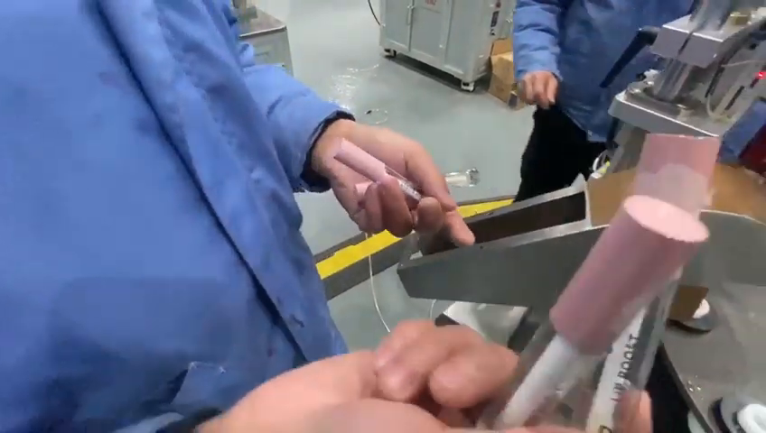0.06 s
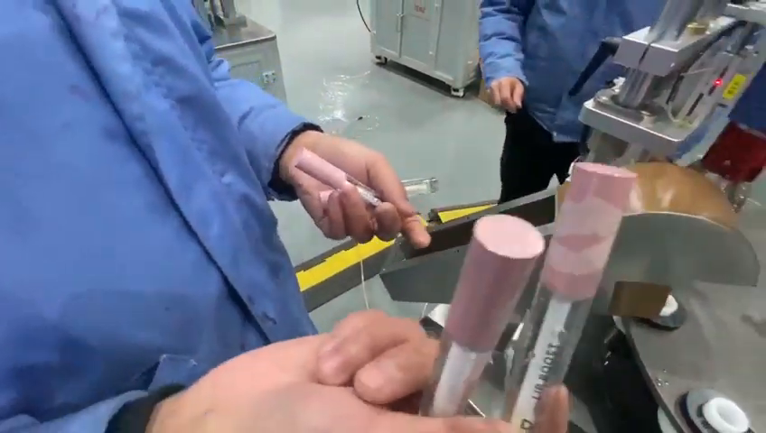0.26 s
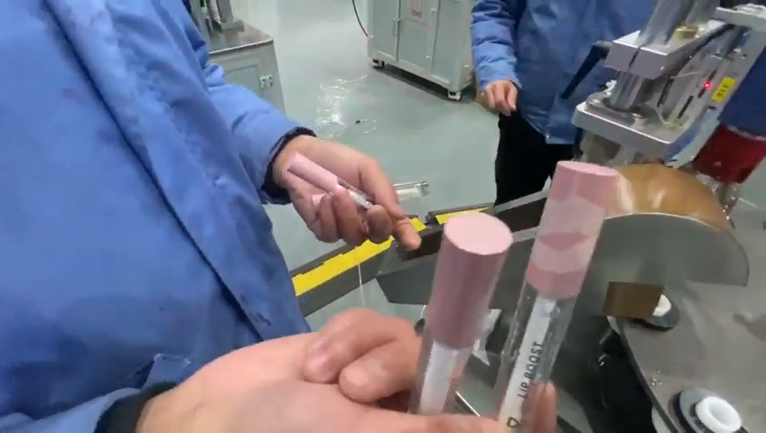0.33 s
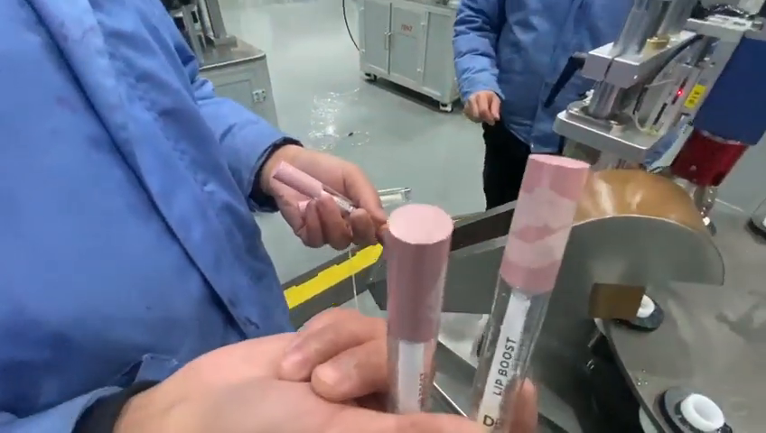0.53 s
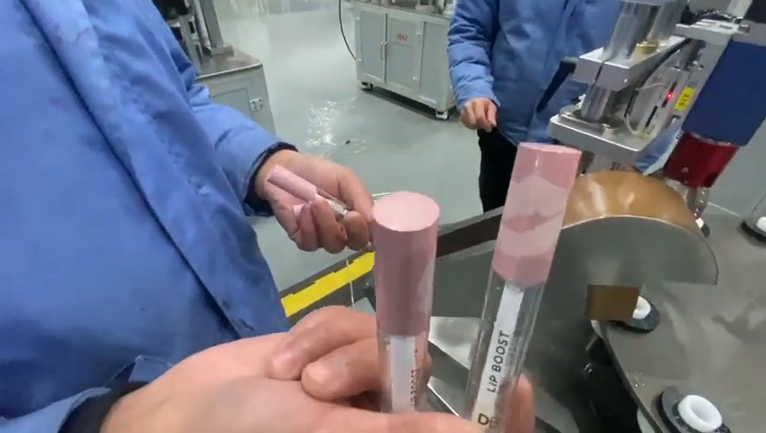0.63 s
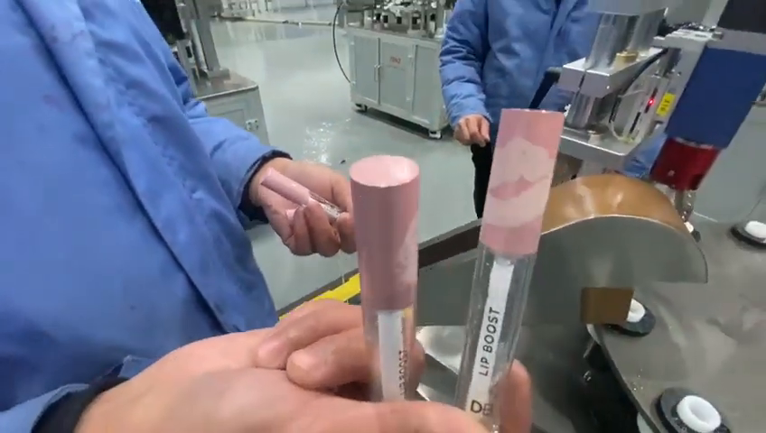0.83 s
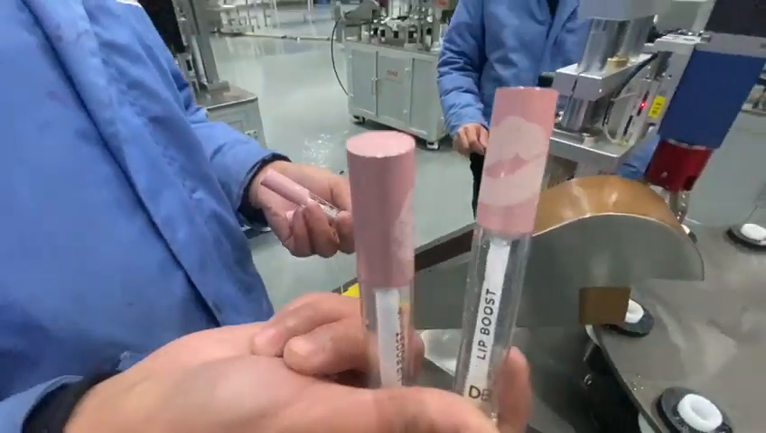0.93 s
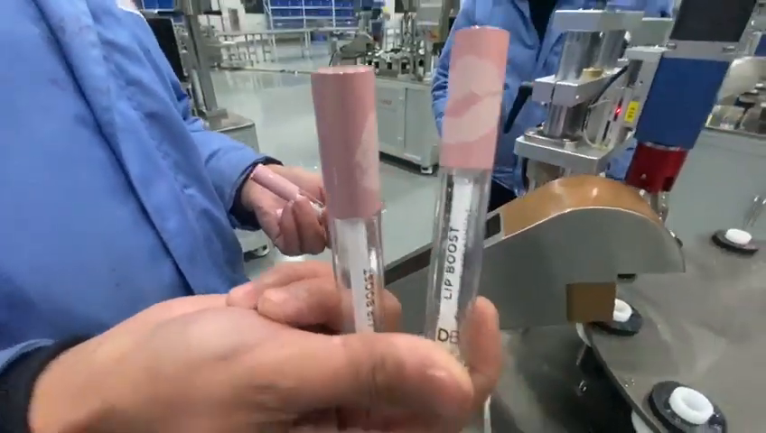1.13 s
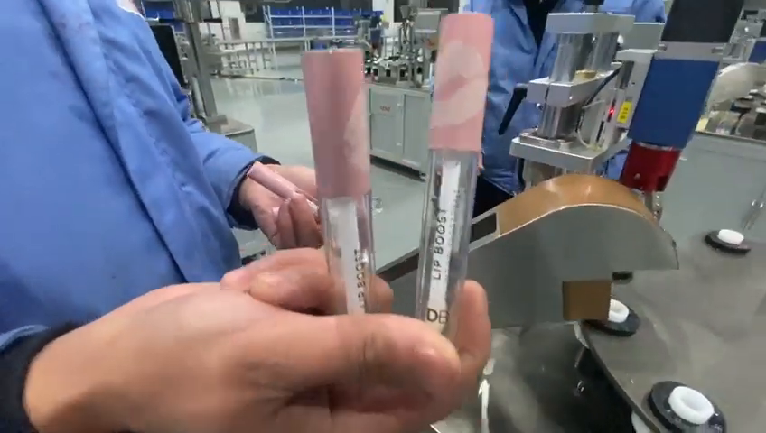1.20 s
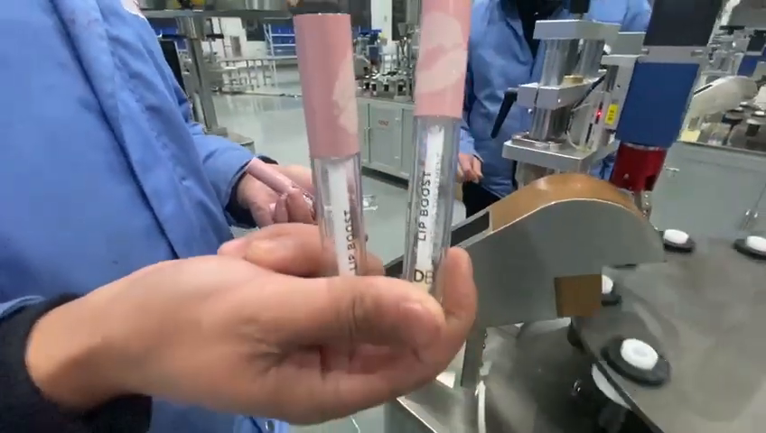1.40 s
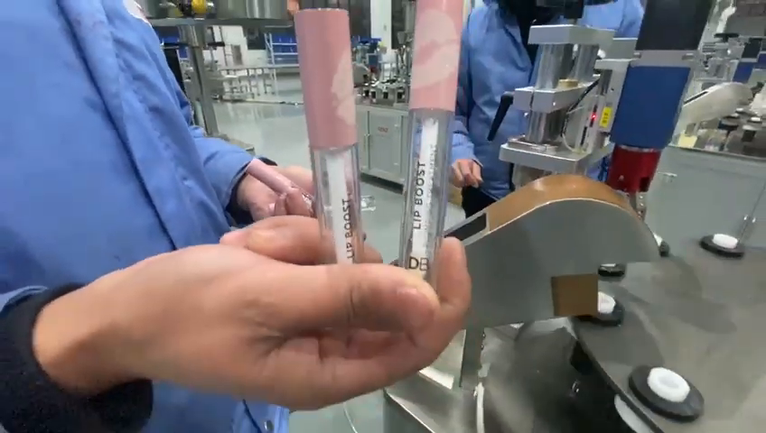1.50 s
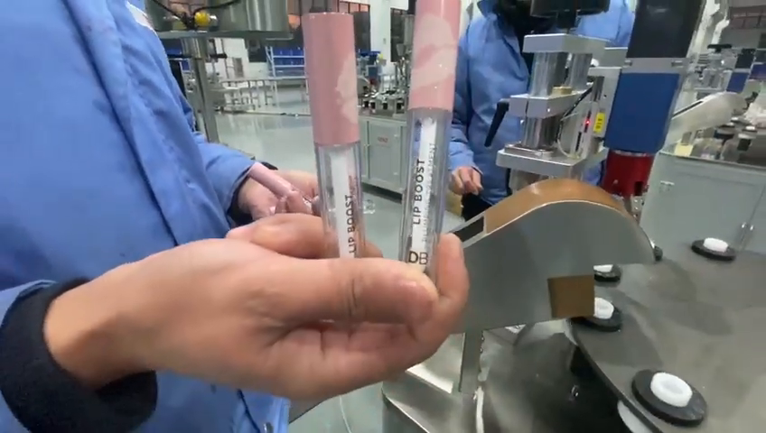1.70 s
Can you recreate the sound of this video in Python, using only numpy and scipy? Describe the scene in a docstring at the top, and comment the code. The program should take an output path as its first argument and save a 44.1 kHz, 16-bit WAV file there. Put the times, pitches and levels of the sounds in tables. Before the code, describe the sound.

A single sharp metallic clack from a nearby machine hits at about 0.25 seconds, just after a brief hiss of air at 0.1, and rings away through a factory hall. A smaller knock follows at 0.45 seconds, then a duller, more distant double clack near 1.25, with a few faint taps around them. Ventilation hums throughout, and thin, high motor whines swell and fade softly.

```python
"""A factory workshop, close beside a tube-filling machine, on a hand-held stereo microphone.
Air hisses briefly, then a part snaps home with one sharp metallic clack that rings in the frame and
dies away in the hall. Small knocks follow, one duller double clack further off. Ventilation hums
throughout and motor drives whine, swelling and fading as the microphone moves."""
import sys
import numpy as np
from scipy.fft import rfft, irfft, next_fast_len
from scipy.io import wavfile
from scipy.ndimage import map_coordinates

SR = 44100
rng = np.random.default_rng(int(sys.argv[2]) if len(sys.argv) > 2 else 0)


def generate_wav(sig):
    """Save sig (samples, or channels by samples) to the path in sys.argv[1] as 16-bit PCM at SR."""
    pcm = np.round(np.clip(np.atleast_2d(sig).T, -1, 1) * 32767).astype(np.int16)
    wavfile.write(sys.argv[1], SR, pcm)


N = 77175

CLACK_S, CLACK_DB, ATTACK_S = 0.2357, -7, 0.00048
FRAME_DB, RISE_CYCLES = -1, 0.91  # the modes take about a cycle to build up
HALL_DB, HALL_RISE_S, SCATTER_DB, SCATTER_T60_S = -30.5, 0.0034, -27, 0.17
KNOCK_RISE_S, KNOCK_PAN_DB, KNOCK_ROOM_DB, KNOCK_ROOM_T60_S = 0.0008, -5.5, -14.5, 0.29
AIR_S, AIR_DB, AIR_RELEASE_S, SPIT_DB, SPIT_T60_S = 0.1122, -46, 0.03, -43, 0.03
LOW_WHINE_HZ, HIGH_WHINE_HZ, WHINE_PAN_DB, WHINE_WAVER_DB = 2094.3, 3008, -13, 1.2
VENT_DB, TOP_HZ = -50, 15800

# Throughout, pan_db is left minus right and density_db is relative level per hertz.
# Colour of the clack's burst: freq_hz, density_db
BURST_SPECTRUM = [(120, -24), (450, -17.5), (600, -6), (830, 5.5), (1100, -6), (1500, -6), (2100, 0),
                  (2480, -13.5), (3000, 0), (4200, -10), (4750, -5.5), (5400, -15.5), (6300, -5.5),
                  (7200, -16.5), (8800, -2.5), (11500, -14), (15500, -27)]
# Decay of the burst: freq_hz, t60_s
BURST_DECAY = [(200, 0.062), (800, 0.05), (3000, 0.05), (5000, 0.043), (9000, 0.015), (15000, 0.021)]
# Direction of the burst: freq_hz, pan_db
BURST_BALANCE = [(200, 3), (700, -7), (1000, -3.5), (3000, 5.5), (6000, -10.5), (9000, -11.5),
                 (12000, -1.5)]
# Modes of the machine frame: pitch_hz, level_db (before FRAME_DB), t60_s, pan_db
FRAME_MODES = [(177, -37, 0.55, -11), (199, -24.5, 0.085, -14), (257, -30.5, 0.24, -27),
               (617, -27.5, 0.29, -13), (885, -32, 0.12, 11), (1065, -34.5, 0.19, 11),
               (1521, -27, 0.075, 2), (1925, -20, 0.064, -2), (2072, -26, 0.086, -6),
               (2246, -30.5, 0.16, 6), (2725, -16.5, 0.097, -8), (2820, -33.5, 0.41, 2),
               (3000, -48, 0.25, 0), (3150, -19, 0.046, 0), (3328, -22, 0.11, -3), (3760, -28, 0.12, -15),
               (4830, -18.5, 0.036, -6)]
# Colour of the hall's answer: freq_hz, density_db
HALL_SPECTRUM = [(100, -26), (250, -1.5), (450, -7.5), (650, -5), (920, 2.5), (1500, -3.5), (3100, 2.5),
                 (4300, -9.5), (6500, -12), (10000, -17.5), (15000, -39)]
# Decay of the hall: freq_hz, t60_s
HALL_DECAY = [(150, 0.25), (500, 0.91), (950, 1.78), (2000, 0.87), (3200, 0.78), (6000, 0.47),
              (12000, 0.37)]
# Direction of the hall's answer and of the air jet: freq_hz, pan_db
HALL_BALANCE = [(200, -14), (1000, -3.5), (3000, -5.5), (9000, -5.0)]
AIR_BALANCE = [(2000, -3.5), (9000, -2.5)]
# Colour of the escaping air: freq_hz, density_db
AIR_SPECTRUM = [(300, -38), (1500, 9), (3500, 4), (7000, -0.5), (10000, 0), (15000, -2)]
# Knocks of other parts: start_s, pitch_hz, ring_db, clatter_db, t60_s
PART_KNOCKS = [(.356, 1300, -50, -46, .03), (.4493, 1290, -28.5, -44, .022), (.4555, 1120, -40, -52, .02),
               (.4705, 970, -39, -50, .03), (.832, 900, -52, -46, .03), (1.2325, 1500, -41, -40.5, .03),
               (1.2378, 830, -40, -31.5, .03), (1.2442, 1050, -36.5, -35, .032),
               (1.47, 1200, -50, -46, .04), (1.495, 2300, -51, -49, .04)]
# Colour of their clatter: freq_hz, density_db
CLATTER_SPECTRUM = [(100, -15), (270, 2), (450, -5), (850, -1), (1400, -1), (2200, -3), (3000, -10),
                    (4000, -19), (6500, -24), (12000, -47)]
# Soft low bumps: start_s, level_db, t60_s
LOW_BUMPS = [(.118, -43.5, 0.19), (0.242, -42, 0.16), (.312, -42, .16)]
# Colour of the bumps: freq_hz, density_db
BUMP_SPECTRUM = [(25, -23), (50, -5), (80, 0), (130, -14), (250, -31), (600, -70)]
# Swells of the low whine, its octave and the high whine: time_s, level_db
LOW_WHINE_SWELL = [(0, -62), (.2, -58), (.4, -55), (.48, -51.5), (.61, -51.5), (.69, -57), (.9, -60.5),
                   (1.03, -55.5), (1.2, -55), (1.26, -51.5), (1.42, -53), (1.5, -61), (1.6, -67),
                   (1.75, -62)]
OCTAVE_SWELL = [(0, -86), (.75, -70), (.87, -60), (.97, -61.5), (1.06, -57.5), (1.2, -69.5), (1.4, -75),
                (1.53, -63.5), (1.75, -68)]
HIGH_WHINE_SWELL = [(1.065, -85), (1.085, -54.5), (1.135, -55), (1.165, -67), (1.2, -56), (1.25, -59),
                    (1.275, -52), (1.41, -50), (1.46, -55), (1.6, -55.5), (1.7, -49), (1.75, -50.5)]
# Faint constant drive tones: pitch_hz, level_db
DRIVE_TONES = [(6282, -75), (9001, -74.5), (10002, -75)]
# Colours of the ventilation, low drone and midrange din: freq_hz, density_db
VENT_SPECTRUM = [(15, -44), (25, -24), (48, -1), (193, -3.5), (567, -9.5), (1200, -8.5), (1800, -15),
                 (2120, -13), (2850, -14.5), (3090, -16), (3340, -15.5), (4150, -14.5), (4500, -21),
                 (9300, -21.5), (12200, -29.5), (13200, -49), (15500, -31)]
DRONE_SPECTRUM = [(70, -22), (140, -1.5), (190, -1.5), (300, -3.5), (450, -12), (900, -44)]
DIN_SPECTRUM = [(400, -20), (850, 4.5), (1300, -4), (3000, -9), (7000, -22), (14000, -50)]
# Swells of the drone and the din: time_s, level_db
DRONE_SWELL = [(0, -57), (.6, -53.5), (.87, -52), (1.2, -50.5), (1.45, -57), (1.75, -61)]
DIN_SWELL = [(0, -45.5), (.1, -49.5), (.4, -50.5), (.73, -51.5), (1, -55), (1.75, -57)]
# Direction of the ventilation and the din: freq_hz, pan_db
ROOM_BALANCE = [(40, -11), (100, -3.5), (180, -11), (450, -2), (1000, -3), (3000, -6), (6500, -2),
                (9500, -14), (12000, 3)]
# Likeness of noise at the two sides of the microphone: freq_hz, correlation
STEREO_LIKENESS = [(40, 0.31), (200, 0.097), (600, 0), (3000, 0), (12000, 0)]


def clack():
    """Close by, a part snaps home: a burst of dense short modes, then the frame's longer ones."""
    burst = band_decay(noise(BURST_SPECTRUM, BURST_BALANCE), CLACK_S, ATTACK_S, BURST_DECAY)
    ring = 0
    for hz, db, t60, pan_db in FRAME_MODES:
        phase = rng.uniform(0, 2 * np.pi) + 0.91 * rng.standard_normal((2, 1))  # differs per side
        phase = phase + 0.43 * wobble(59.7)
        mode = np.sin(2 * np.pi * hz * (clock() - CLACK_S) + phase)
        ring = ring + amp(db) * sides(pan_db) * mode * strike(CLACK_S, RISE_CYCLES / hz, t60)
    return amp(CLACK_DB) * burst + amp(FRAME_DB) * ring


def hall():
    """Nearby machines scatter the clack back to the microphone; the hall's tail follows."""
    scatter = noise(HALL_SPECTRUM, HALL_BALANCE) * strike(CLACK_S, rise_s=0.0025, t60_s=SCATTER_T60_S)
    tail = band_decay(noise(HALL_SPECTRUM, HALL_BALANCE), CLACK_S, HALL_RISE_S, HALL_DECAY)
    return amp(SCATTER_DB) * scatter + amp(HALL_DB) * tail


def air():
    """Compressed air spits as a valve opens, hisses, and dies quickly after the clack."""
    release = np.exp(-np.maximum(clock() - CLACK_S, 0) / AIR_RELEASE_S)
    hiss = amp(AIR_DB) * strike(AIR_S, rise_s=0.002, t60_s=7.1) * release
    spit = amp(SPIT_DB) * strike(AIR_S, ATTACK_S, SPIT_T60_S)
    return (hiss + spit) * noise(AIR_SPECTRUM, AIR_BALANCE)


def knocks():
    """Other parts knock further off: one short resonance, a dull clatter and a little room each."""
    out = 0
    for start_s, hz, ring_db, clatter_db, t60 in PART_KNOCKS:
        blow = strike(start_s, KNOCK_RISE_S, t60)
        room = amp(KNOCK_ROOM_DB) * strike(start_s, HALL_RISE_S, KNOCK_ROOM_T60_S)
        ring = amp(ring_db) * blow * np.sin(2 * np.pi * hz * (clock() - start_s)) * sides(KNOCK_PAN_DB)
        clatter = amp(clatter_db) * (blow + room) * noise(CLATTER_SPECTRUM, [(1000, KNOCK_PAN_DB)])
        out = out + ring + clatter
    return out


def bumps():
    """Soft bass bumps around the clack, to the right of the microphone."""
    out = 0
    for start_s, db, t60 in LOW_BUMPS:
        envelope = strike(start_s, rise_s=0.0057, t60_s=t60)
        out = out + amp(db) * envelope * noise(BUMP_SPECTRUM, balance=[(80, -9)])
    return out


def whines():
    """Motor drives sing at set pitches, wavering separately at each side of the moving microphone."""
    swelling = [(LOW_WHINE_HZ, swell(LOW_WHINE_SWELL)), (2 * LOW_WHINE_HZ, swell(OCTAVE_SWELL)),
                (HIGH_WHINE_HZ, swell(HIGH_WHINE_SWELL))]
    constant = [(hz, amp(db)) for hz, db in DRIVE_TONES]
    out = 0
    for hz, gain in swelling + constant:
        waver = amp(WHINE_WAVER_DB * np.array([wobble(14.4), wobble(14.34)]))
        phase_drift = 0.81 * np.array([wobble(4.1), wobble(4.07)])
        out = out + np.sqrt(2) * gain * waver * np.sin(2 * np.pi * hz * clock() + phase_drift)
    return out * sides(WHINE_PAN_DB)


def room_tone():
    """Behind it all: steady ventilation, a low drone that swells and the hall's midrange din."""
    vent = amp(VENT_DB + 0.54 * wobble(5.6)) * noise(VENT_SPECTRUM, ROOM_BALANCE)
    drone = swell(DRONE_SWELL) * amp(2.5 * wobble(17.88)) * noise(DRONE_SPECTRUM, balance=[(200, -12)])
    din = swell(DIN_SWELL) * amp(2.5 * wobble(16)) * noise(DIN_SPECTRUM, ROOM_BALANCE)
    return vent + drone + din


def amp(db):
    """Decibels to gain."""
    return 10 ** (np.asarray(db) / 20)


def along(points, hz):
    """Read (freq_hz, value) points on a log frequency axis."""
    freqs, values = np.transpose(points)
    return np.interp(np.log(hz + 1), np.log(freqs + 1), values)


def clock():
    """Time of each sample in seconds."""
    return np.arange(N) / SR


def swell(points):
    """Gain per sample from (time_s, level_db) points."""
    return amp(np.interp(clock(), *np.transpose(points)))


def wobble(rate_hz):
    """A smooth random curve with rate_hz knots a second."""
    return map_coordinates(rng.standard_normal(int(N * rate_hz / SR) + 4), [clock() * rate_hz])


def sides(pan_db):
    """Left and right gains of constant power."""
    gains = amp(np.array([[.5], [-.5]]) * pan_db)
    return gains / np.sqrt(np.mean(gains ** 2, axis=0))


def noise(spectrum, balance):
    """Coloured stereo noise of rms 1, its sides partly alike in the bass only."""
    hz = np.fft.rfftfreq(N, 1 / SR)
    mid, side = rfft(rng.standard_normal((2, N)))
    angle = np.arccos(np.clip(along(STEREO_LIKENESS, hz), -1, 1)) / 2
    mid, side = np.cos(angle) * mid, np.sin(angle) * side
    pair = np.array([mid + side, mid - side])
    coloured = irfft(pair * amp(along(spectrum, hz)) * sides(along(balance, hz)), N)
    return coloured / np.sqrt(np.mean(coloured ** 2) + 1e-20)


def strike(start_s, rise_s, t60_s):
    """Envelope of a blow: quick rise, exponential decay."""
    age = np.maximum(clock() - start_s, 0)
    return (1 - np.exp(-age / rise_s)) * np.exp(-np.log(1000) * age / t60_s)


def band_decay(sound, start_s, rise_s, decays):
    """Strike a sound so that each (freq_hz, t60_s) band dies at its own speed."""
    hz, spectrum = np.fft.rfftfreq(N, 1 / SR), rfft(sound)
    centres, t60s = np.transpose(decays)
    shares = [along(np.c_[centres, row], hz) for row in np.eye(len(centres))]
    bands = [irfft(spectrum * share, N) for share in shares]
    return sum(band * strike(start_s, rise_s, t60) for band, t60 in zip(bands, t60s))


def scene():
    """All sources at the microphone."""
    return clack() + hall() + knocks() + bumps() + air() + room_tone() + whines()


def record(dry):
    """The recorder rounds off the highest peaks and keeps nothing above its band limit."""
    rounded = dry / (1 + dry ** 8) ** (1 / 8)
    size = next_fast_len(N + SR // 2)
    passband = np.fft.rfftfreq(size, 1 / SR) < TOP_HZ
    return irfft(rfft(rounded, size) * passband, size)[:, :N]


dry = scene()
out = record(dry)
generate_wav(out)
```